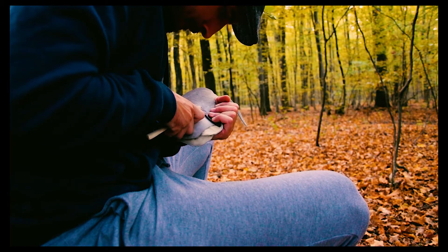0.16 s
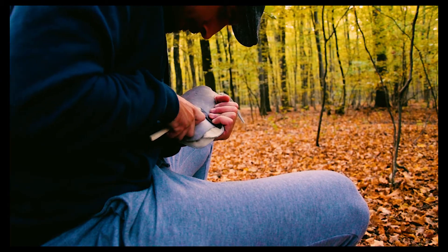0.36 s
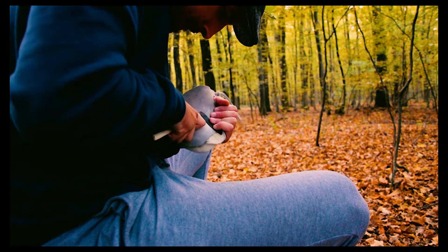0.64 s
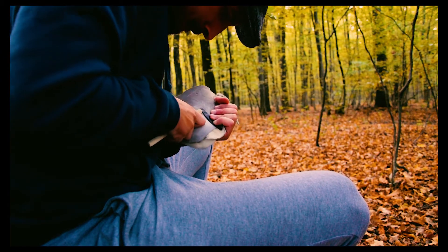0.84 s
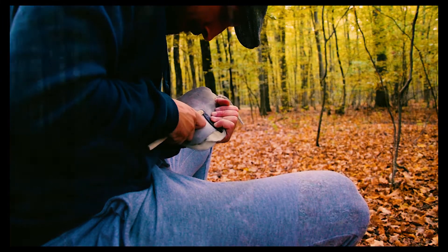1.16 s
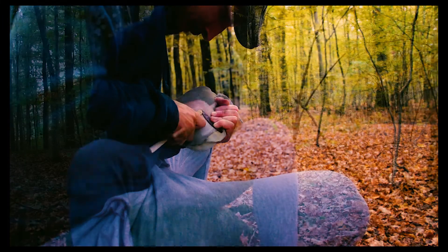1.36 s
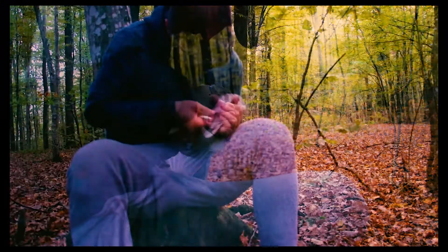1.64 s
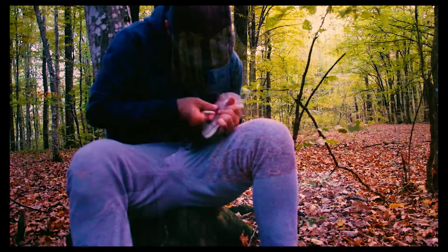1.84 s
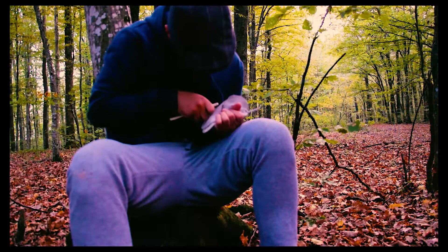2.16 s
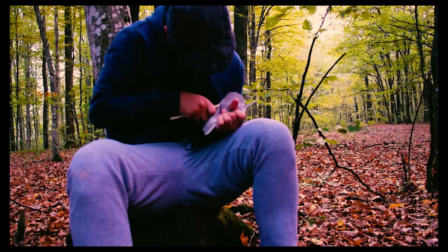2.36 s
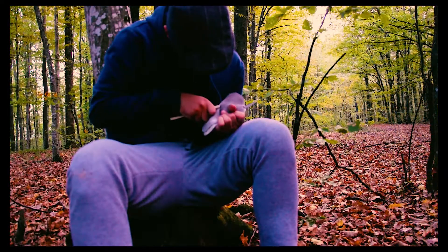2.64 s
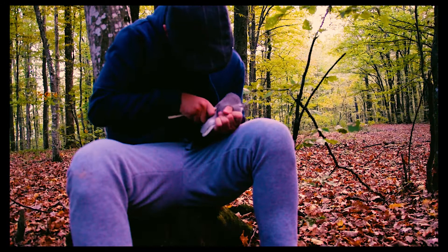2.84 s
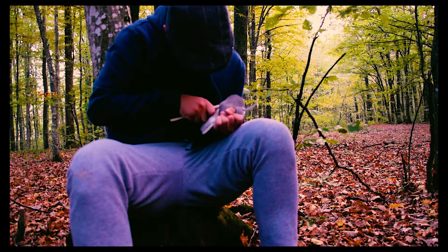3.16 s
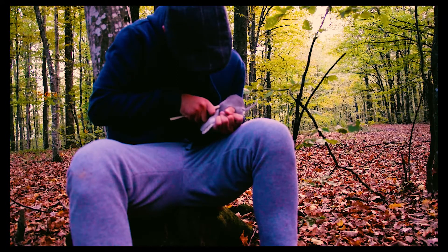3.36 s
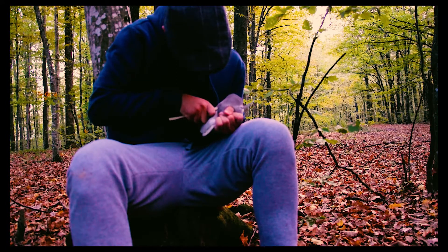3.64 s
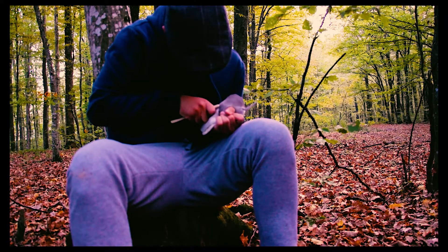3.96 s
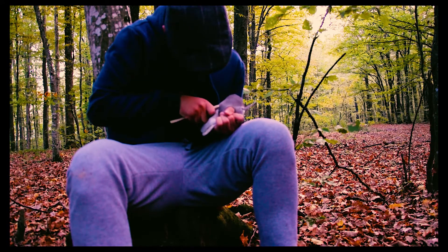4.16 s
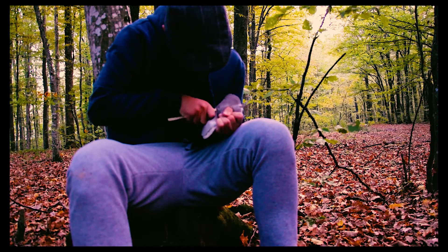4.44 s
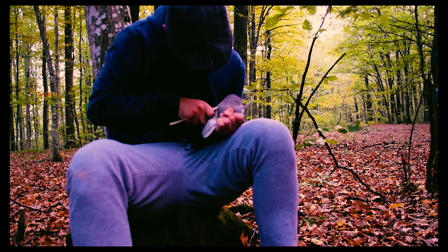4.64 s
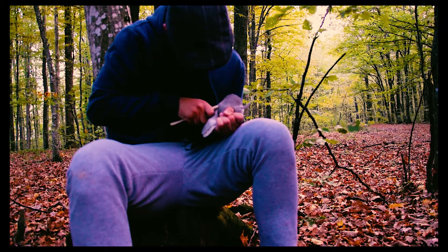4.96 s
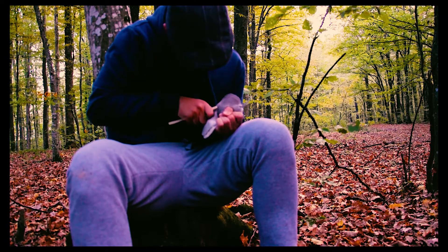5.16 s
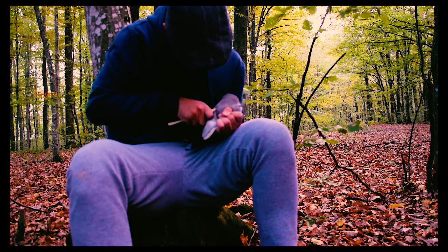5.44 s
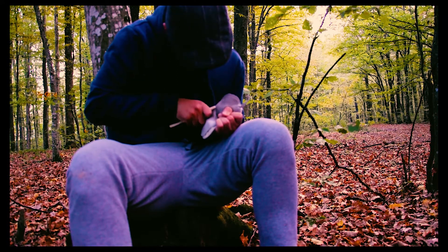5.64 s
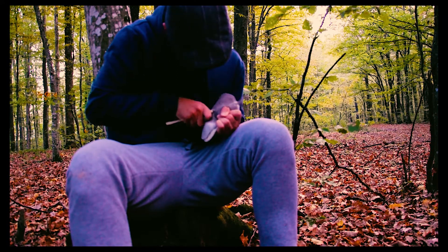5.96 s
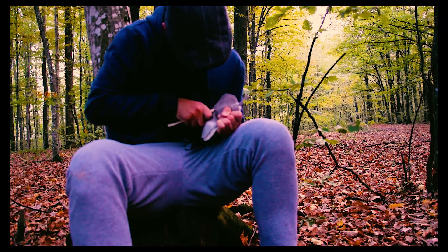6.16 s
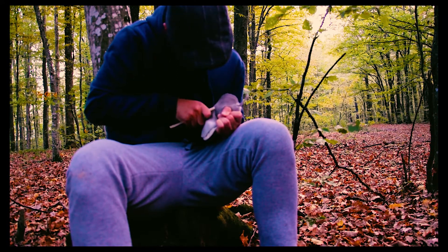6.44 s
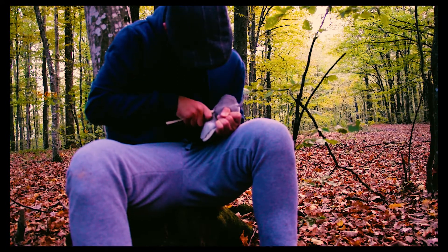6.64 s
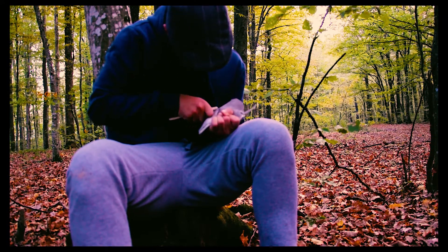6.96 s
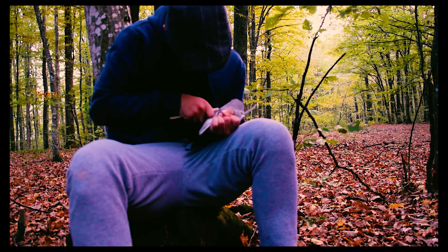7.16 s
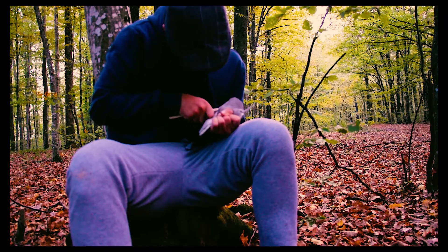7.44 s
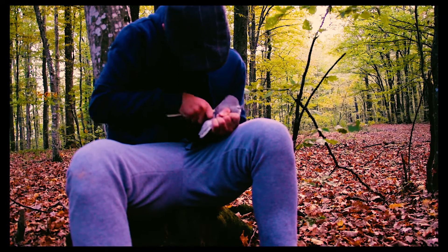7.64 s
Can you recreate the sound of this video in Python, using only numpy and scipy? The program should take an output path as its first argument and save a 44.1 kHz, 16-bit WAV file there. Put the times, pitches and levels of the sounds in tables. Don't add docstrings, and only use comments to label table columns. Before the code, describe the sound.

Irregular crisp clicks of stone chips pressed off a blade on leather, very close, in a quiet wood with insects and distant birds.

```python
import sys
import numpy as np
from scipy import signal
from scipy.fft import rfft, irfft, next_fast_len
from scipy.io import wavfile
from scipy.ndimage import uniform_filter1d

SR = 44100
rng = np.random.default_rng(int(sys.argv[2]) if len(sys.argv) > 2 else 0)


def transcribe(signal):
    frames = np.atleast_2d(signal).T
    limited = np.clip(frames, -1, 1)
    pcm = np.round(limited * 32767).astype(np.int16)
    wavfile.write(sys.argv[1], SR, pcm)


def gain_from_db(level_db):
    decades = np.asarray(level_db, float) / 20
    return 10 ** decades


N = 343980
TIME = np.arange(N) / SR

# time in seconds, share of the second spot 0-1.
SPOT_SHARE = [
    (0, 0.4),
    (1.25, 0.25),
    (1.85, 0.96),
    (7.8, 1),
]
# frequency in Hz, density in dB per Hz.
FIRST_AIR_COLOUR = [(25, -45.5), (65, -9.5), (150, -11), (330, -11), (660, -3), (840, -7.5), (1100, -0.5),
                    (1450, -8.5), (3200, -12), (4800, -11), (7100, -18), (10000, -24.5), (14800, -30),
                    (16200, -24)]
# frequency in Hz, density in dB per Hz.
SECOND_AIR_COLOUR = [(25, -49.5), (65, -14.5), (150, -15.5), (400, -10.5), (640, -6.5), (850, -8.5),
                     (1650, -10.5), (1910, -6.5), (2200, -12.5), (3300, -11.5), (4900, -16.5), (7000, -23),
                     (11000, -28), (16200, -37.5)]
# frequency in Hz, correlation 0-1.
EAR_LIKENESS = [(60, .92), (130, 0.68), (600, 0.37), (3000, 0.4), (12000, 0.01)]
# centre in Hz at the first spot, centre in Hz at the second, width in Hz, level in dB,
# left minus right in dB, wing pulses per second, pulse depth 0-1.
INSECT_CHOIRS = [
    (3800, 3918, 250, -61.5, -10, 41, 0.3),
    (4320, 4420, 170, -70.5, -8.5, 85, 0.5),
    (5450, 5450, 500, -69, -7, 57, 0.2),
    (6100, 6200, 300, -76, -3, 110, 0.5),
    (3850, 3880, 160, -61.5, -3, 14, 0),
]
# start in seconds, length in ms, start pitch in Hz, turning pitch in Hz,
# level in dB.
BIRD_ARCHES = [(2.272, 31, 2250, 3800, -57.5), (2.435, 25, 2153, 3590, -58),
               (2.981, 21.3, 2454, 3790, -52.5), (3.151, 26, 2500, 3895, -52),
               (3.785, 17.3, 2470, 3685, -51), (3.985, 22.4, 2416, 3634, -52.5),
               (4.48, 27.6, 2297, 3540, -52), (4.846, 20.5, 2630, 3464, -51.5),
               (5.240, 27, 2220, 3610, -53), (5.891, 21.1, 2520, 3715, -49.5),
               (6.280, 17.5, 2790, 3950, -51), (6.410, 23, 2503, 3700, -52)]
# start in seconds, start pitch in Hz, level in dB.
BIRD_FALLS = [(2.379, 7600, -58), (2.913, 7500, -57.5), (3.092, 7270, -58), (3.718, 6900, -66),
              (3.924, 7750, -62.5), (4.266, 6900, -63), (4.422, 6910, -54.5), (5.180, 7230, -57.5),
              (5.829, 7100, -58), (6.210, 7170, -60), (6.353, 7760, -63)]
# start in seconds, length in ms, pitch in Hz, level in dB.
BIRD_WHISTLES = [
    (3.388, 36, 5000, -62),
    (3.478, 33, 5000, -67),
    (7.050, 33, 2320, -62.5),
    (7.060, 170, 4760, -70),
    (7.641, 65, 3280, -61),
    (7.700, 37, 5100, -64),
    (7.705, 48, 2550, -64),
    (7.710, 42, 7600, -74),
]
# frequency in Hz, density in dB per Hz.
EARLY_ECHO_COLOUR = [(200, -38), (800, -17), (2500, -8.5), (5000, 3.5), (9000, -1.5), (15000, -20)]
# frequency in Hz, density in dB per Hz.
LATE_ECHO_COLOUR = [(200, -22.5), (800, -4.5), (2500, -6), (4500, 3.5), (8000, -17.5), (15000, -26)]
# frequency in Hz, density in dB per Hz.
EAR_DIFFERENCE_COLOUR = [(300, -6.5), (1200, -8), (4000, 5.5), (8000, 6.5), (13000, 6)]
# start in seconds, echo in dB, splinter pitch in Hz, splinter in dB,
# edge ring in dB over the blade ring.
CHIP_SIZES = [(0.5328, -7, 9260, -1, -13), (0.8874, -44, 10000, -1, -18), (1.5125, -15, 10270, 2.5, -15),
              (2.8206, -21, 9800, -1.5, -7.5), (3.4331, -37, 8700, -5, -6), (3.475, -42, 7670, -4, -8),
              (3.5154, -31, 8300, -12, -12), (4.2996, -6, 8450, -3, -3), (4.334, -3, 9400, -2, -7),
              (5.1996, -11.5, 8250, -5.5, -2.5), (5.2664, -4.5, 8550, 8.5, -2.5),
              (5.942, -3.5, 8750, -1, -13), (5.9773, -23, 8500, -7, -16), (6.5584, -46, 8000, 1.5, -20),
              (6.6034, -19, 8700, 0, -19), (7.5747, -26, 8500, -13.5, -18)]
# start in seconds, pad thud in dB over the ring, thud pitch in Hz,
# knock in dB, knock pitch in Hz.
CHIP_HAND = [(0.533, -5.5, 1214, -12.5, 554), (0.888, -1, 840, -51, 700), (1.512, -12.5, 1050, -22.5, 570),
             (2.821, -1, 1110, -34, 395), (3.433, 3, 517, -51, 600), (3.473, 3.5, 650, -58, 450),
             (3.515, -18, 1150, -20, 550), (4.300, -18, 1120, -23, 436), (4.334, -11, 1334, -23.5, 340),
             (5.2, -9.5, 1160, -32.5, 392), (5.265, -13.5, 1330, -40, 189),
             (5.942, -10.5, 1250, -38.5, 700), (5.978, -11, 1160, -43.5, 170), (6.558, 9, 1280, -57, 600),
             (6.603, -20, 990, -30.5, 403), (7.574, -1.5, 960, -23, 414)]
# start in seconds, length in ms, pitch in Hz, level in dB.
LEATHER_RUBS = [
    (0.150, 45, 1150, -69),
    (0.878, 43, 1160, -54),
    (1.056, 18, 1026, -58),
    (1.188, 20, 804, -56),
    (3.074, 47, 730, -59.5),
    (4.920, 18, 700, -58.5),
]
# start in seconds, crack in dB, tap in dB.
GRIT_TICKS = [(0.5473, -38, -39), (0.8375, -46, -70), (0.8425, -52, -44), (0.9052, -60, -38),
              (0.9309, -50, -70), (1.062, -68, -61), (1.1987, -59, -45), (1.3825, -33.5, -42),
              (1.4279, -39, -44), (1.8924, -56.5, -38), (1.9797, -51, -63), (2.857, -51, -50),
              (3.093, -52, -67.5), (4.3302, -42, -67.5), (4.927, -43.5, -52), (4.9809, -54, -62.5),
              (5.1811, -75, -65.5), (5.6145, -55, -72), (5.7887, -34, -72), (5.8064, -44, -70),
              (6.0774, -46, -63), (6.2687, -52, -64), (6.5397, -49, -70), (6.6658, -49, -48),
              (6.6923, -38.5, -70), (7.1513, -45, -55), (7.4747, -61, -39)]
# frequency in Hz, t60 in seconds, level in dB.
FLINT_MODES = [(5000, 0.0012, -5), (7710, 0.00058, 6), (11300, 0.0015, -14)]
# start in seconds, blade ring in dB, ring pitch in Hz, crack in dB.
TOOL_SLIPS = [(0.534, -7, 5260, -5.5), (0.535, -15.5, 2680, -13), (0.5365, -13.5, 1860, -34.5),
              (0.5394, -28, 2430, -28), (0.5400, -24, 1740, -33), (0.8906, -35.5, 1700, -47),
              (0.9006, -36.5, 1540, -55), (1.513, -7, 2040, -12.5), (2.8225, -21, 2320, -31.5),
              (2.8257, -22, 2130, -31.5), (3.4336, -33, 2200, -39.5), (3.4757, -38.5, 2150, -42),
              (3.515, -17, 1170, -48), (3.5168, -18.5, 2400, -28), (3.519, -25.5, 2300, -32),
              (3.521, -26, 2695, -37), (4.3003, 0, 2760, -13), (4.3349, -6.5, 2620, -10),
              (4.3374, -4, 2380, -11.5), (5.1997, -10, 2520, -14.5), (5.2671, 1.5, 2750, -7),
              (5.9425, -6, 2354, -9), (5.949, -13.5, 2560, -19.5), (5.9753, -15, 2770, -24),
              (5.978, -8.5, 2410, -19), (6.5603, -43, 1860, -69.5), (6.6035, -16, 2110, -26),
              (6.6051, -13.5, 2560, -25), (7.5751, -21, 1625, -26), (7.5768, -26.5, 3050, -33.5)]


def shape(table, hz):
    f, v = np.transpose(table)
    return np.interp(np.log(np.maximum(hz, 1)), np.log(f), v)


def coloured(gain, size):
    fast = next_fast_len(size)
    hz = np.arange(fast // 2 + 1) * SR / fast
    x = irfft(rfft(rng.standard_normal(fast)) * gain(hz), fast)[:size]
    return x / x.std()


def walk(rate):
    k = int(SR / rate)
    held = np.repeat(rng.standard_normal(N // k + 1), k)
    return 1.7 * uniform_filter1d(uniform_filter1d(held, k), k)[:N]


def mode(hz, t60, rise):
    t = np.arange(2048) / SR
    push = np.sin(np.minimum(t / rise, 1) * np.pi / 2) ** 2
    return push * np.exp(-np.log(1000) * t / t60) * np.sin(2 * np.pi * hz * t)


def add(track, s, sound):
    i = int(s * SR)
    track[i:i + len(sound)] += sound[:N - i]


def trunks(x, colour, delay_s, t60, db):
    t = np.arange(int(1.2 * t60 * SR)) / SR
    swell = (1 - np.exp(-(t / delay_s) ** 2)) * np.exp(-np.log(1000) * t / t60)
    echo = swell * coloured(lambda hz: gain_from_db(shape(colour, hz)), len(t))
    return gain_from_db(db) * signal.fftconvolve(x, echo / np.sqrt(np.sum(echo ** 2)))[:N]


def electronic_whine(second):
    ear_phase = np.array([[0], [1]])
    return gain_from_db(-82 - 4 * second) * np.sin(2 * np.pi * 15713 * TIME + ear_phase)


def air(colour, db):
    fast = next_fast_len(N)
    hz = np.arange(fast // 2 + 1) * SR / fast
    like = np.clip(shape(EAR_LIKENESS, hz), 0, 1)
    mid = rfft(rng.standard_normal(fast)) * gain_from_db(shape(colour, hz)) * np.sqrt(1 + like)
    side = rfft(rng.standard_normal(fast)) * gain_from_db(shape(colour, hz)) * np.sqrt(1 - like)
    ears = np.array([mid + side, mid - side])
    place = np.clip(np.log2(np.maximum(hz, 1) / 40) / 2, 0, 4)
    out, swell = 0, walk(0.97)
    for k in range(5):
        band = np.cos(np.clip(place - k, -1, 1) * np.pi / 2) ** 2
        gust = gain_from_db(0.21 * swell + 1.0 * walk(6))
        out = out + gust * irfft(ears * band, fast)[:, :N]
    return gain_from_db(db) * out / out.std()


def insects(second):
    out = 0
    for first_hz, second_hz, width, db, pan_db, rate, depth in INSECT_CHOIRS:
        pan = gain_from_db(np.array([[pan_db], [-pan_db]]) / 2)
        for hz, share in ((first_hz, 1 - second), (second_hz, second)):
            near, left, right = (coloured(lambda f: 1 / (1 + (2 * (f - hz) / width) ** 2), N) for _ in range(3))
            pulse_hz = rate * (1 + 0.26 * walk(3))
            throb = 1 + np.clip(depth, 0, 1) * np.sin(2 * np.pi * np.cumsum(pulse_hz) / SR)
            sides = (0.78 * near + 0.51 * np.array([left, right])) * pan
            out = out + np.sqrt(share) * gain_from_db(db + 0.82 * walk(1.5)) * throb * sides
    return out


def bird_notes():
    arches = [(s, ms, hz, turn_hz, 1.07 * hz, db) for s, ms, hz, turn_hz, db in BIRD_ARCHES]
    falls = [(s, 16, hz, 0.72 * hz, 0.63 * hz, db) for s, hz, db in BIRD_FALLS]
    whistle_end = 0.95
    whistles = [(s, ms, hz, (1 + whistle_end) / 2 * hz, whistle_end * hz, db) for s, ms, hz, db in BIRD_WHISTLES]
    return arches + falls + whistles


def birds():
    track = np.zeros(N)
    for s, ms, start_hz, turn_hz, end_hz, db in bird_notes():
        u = np.linspace(0, 1, int(ms * SR / 1000))
        pitch = np.interp(u, [0, .6, 1], [start_hz, turn_hz, end_hz])
        phase = 2 * np.pi * np.cumsum(pitch) / SR
        add(track, s, gain_from_db(db) * np.sin(np.pi * u) ** 0.1 * np.sin(phase))
    track = track * (1 + .4 * walk(900))
    scattered = track * walk(2400)
    colour = [(1000, -2.0), (4000, -4.5), (5500, -4.0), (8000, -7.5)]  # Hz, dB per Hz
    blur = np.array([trunks(track, colour, 0.001, 0.1, -3.0) for _ in range(2)])
    wet = np.array([trunks(scattered, colour, 0.0092, 1.0, 2.2) for _ in range(2)])
    return track * gain_from_db(np.array([[-.6], [.6]])) + blur + wet


def blows():
    track = np.zeros(N)
    for s, echo_db, *_ in CHIP_SIZES:
        add(track, s, gain_from_db(echo_db) * np.ones(1))
    return track


def knocks():
    track = np.zeros(N)
    lag_s = .002
    for s, _, _, db, hz in CHIP_HAND:
        thin = signal.butter(3, 0.64 * hz, "highpass", fs=SR, output="sos")
        add(track, s + lag_s, gain_from_db(db) * signal.sosfilt(thin, mode(hz, 5.16 / hz, 0.0014)))
    return track


def rubs():
    track = np.zeros(N)
    for (s, ms, hz, db), luck in zip(LEATHER_RUBS, rng.standard_normal((len(LEATHER_RUBS), 4096))):
        size = min(int(ms * SR / 1000), len(luck))
        tugs = luck[:size] ** 3 * np.hanning(size)
        add(track, s, gain_from_db(db) * signal.fftconvolve(tugs, mode(hz, 0.0039, 0.00026)) * 0.13)
    return track


def crack(luck, burst_s, splinters):
    burst = luck[8:] * np.exp(-np.arange(len(luck) - 8) / SR / burst_s)
    rings = 0
    for k, (hz, t60, db) in enumerate(FLINT_MODES + splinters):
        rings = rings + gain_from_db(db + 2.3 * luck[k]) * mode(hz, t60, .00006)
    sound = signal.fftconvolve(rings, burst)
    return sound / np.abs(sound).max()


def grit():
    track = np.zeros(N)
    for (s, crack_db, tap_db), luck in zip(GRIT_TICKS, rng.standard_normal((len(GRIT_TICKS), 80))):
        tick = signal.lfilter([1, -2, 1], 1, crack(luck, 0.00022, [])) * 0.74
        add(track, s, gain_from_db(crack_db) * tick)
        add(track, s, gain_from_db(tap_db) * mode(950 * (1 + .1 * luck[7]), 0.005, 0.00038))
    return track


def slips():
    track, starts = np.zeros(N), np.array(CHIP_SIZES)[:, 0]
    for (s, ring_db, ring_hz, crack_db), luck in zip(TOOL_SLIPS, rng.standard_normal((len(TOOL_SLIPS), 144))):
        chip = np.argmin(np.abs(starts - s))
        splinter_hz, splinter_db, edge_db = CHIP_SIZES[chip][2:]
        thud_db, thud_hz = CHIP_HAND[chip][1:3]
        ring = mode(ring_hz, 0.005 * gain_from_db(0.04 * (ring_db + 16)), 0.00049)
        ring = ring + gain_from_db(-11) * mode(0.96 * ring_hz, .004, 0.0006)
        edge = gain_from_db(edge_db) * mode(4080, 0.0054, .0006)
        thud = gain_from_db(thud_db) * mode(thud_hz, 8.0 / thud_hz, 0.0008)
        add(track, s, gain_from_db(ring_db) * (ring + edge - thud))
        undertone = (0.684 * splinter_hz, .003, splinter_db - 7.5)
        splinters = [undertone, (splinter_hz, .0025, splinter_db)]
        add(track, s, gain_from_db(crack_db) * crack(luck, 0.00027, splinters))
    return track


def flaking():
    band = signal.butter(3, (300, 12500), "bandpass", fs=SR, output="sos")
    return signal.sosfilt(band, slips() + grit() + rubs())


def scene():
    second = np.clip(np.interp(TIME, *np.transpose(SPOT_SHARE)), 0, 1)
    wood = np.sqrt(1 - second) * air(FIRST_AIR_COLOUR, -58) + np.sqrt(second) * air(SECOND_AIR_COLOUR, -58)
    background = wood + insects(second) + birds() + electronic_whine(second)
    chips = flaking()
    hands = trunks(chips, EARLY_ECHO_COLOUR, 0.00083, 0.023, -17.5)
    beside = trunks(chips, EAR_DIFFERENCE_COLOUR, 0.00013, .012, -15.5) * np.array([[1], [-1]])
    early = trunks(blows(), EARLY_ECHO_COLOUR, 0.004, 0.33, -15.5)
    late = trunks(chips, LATE_ECHO_COLOUR, 0.012, 0.79, -31)
    return chips + knocks() + hands + early + late + beside + background


def band_limit(x):
    return signal.sosfilt(signal.butter(12, 16850, fs=SR, output="sos"), x)


def record(dry):
    top = signal.ellip(8, .2, 60, 16300, fs=SR, output="sos")
    mix = np.clip(signal.sosfilt(top, dry), -1, 1)
    return band_limit(mix)


dry = scene()
out = record(dry)
transcribe(out)
```